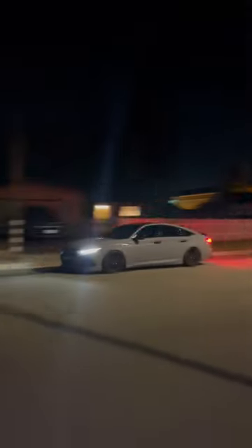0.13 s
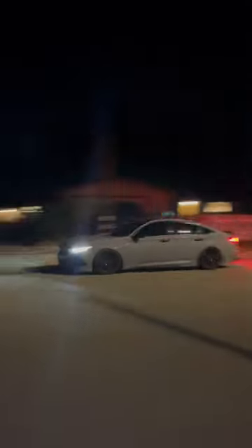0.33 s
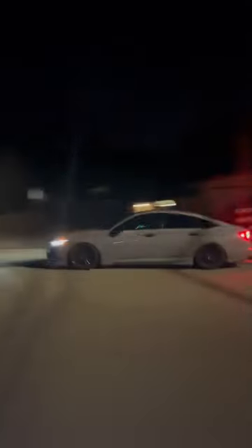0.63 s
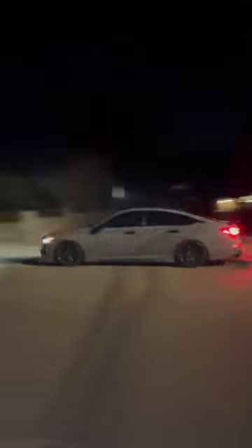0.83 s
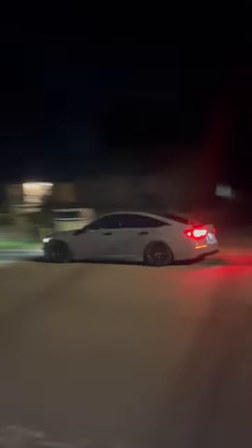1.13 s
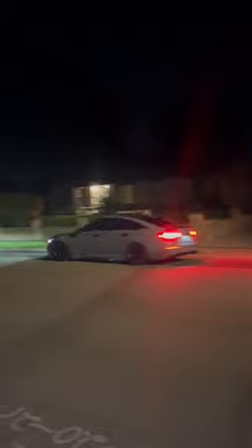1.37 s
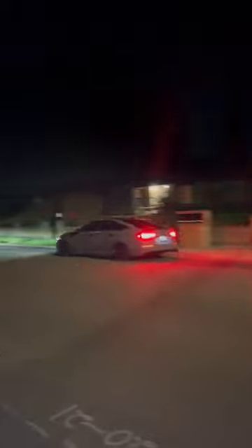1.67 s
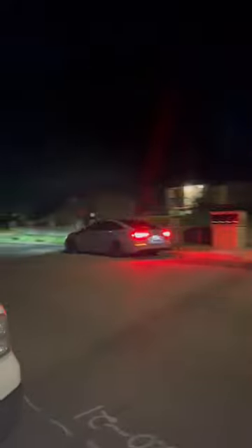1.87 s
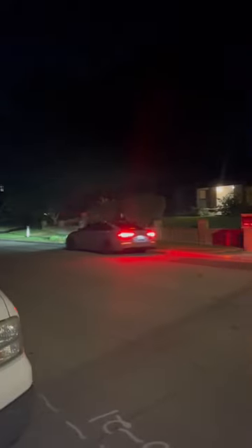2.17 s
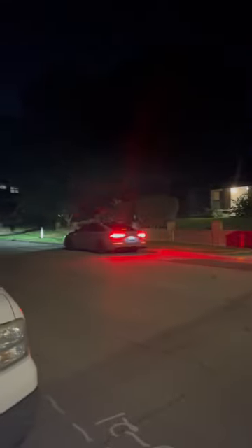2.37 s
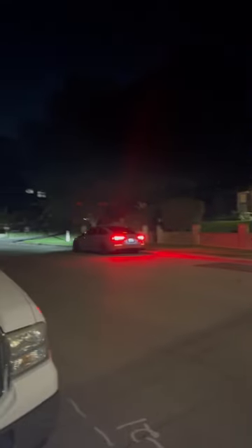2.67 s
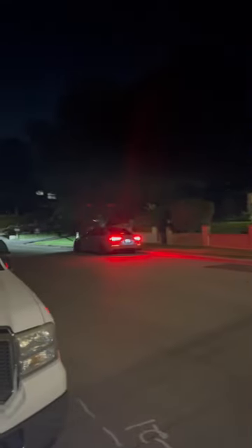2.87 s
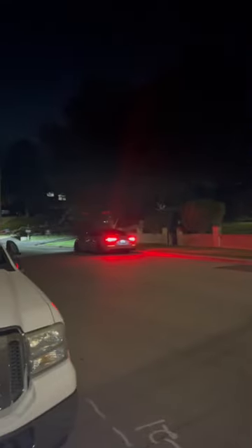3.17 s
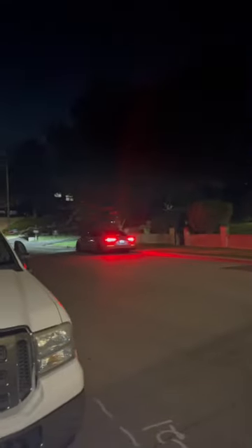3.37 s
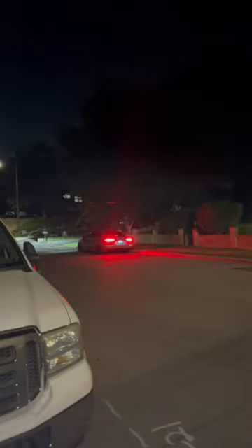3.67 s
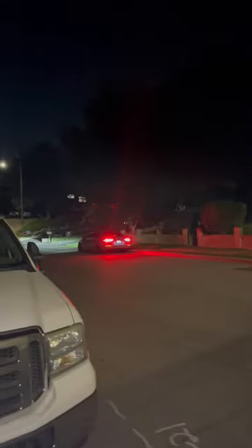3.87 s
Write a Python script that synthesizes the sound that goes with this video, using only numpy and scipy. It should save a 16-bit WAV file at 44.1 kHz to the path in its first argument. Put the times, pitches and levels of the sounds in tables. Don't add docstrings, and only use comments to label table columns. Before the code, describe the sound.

Car exhaust pops and crackles rapidly over a sinking engine burble as it drives away at night

```python
import sys
import numpy as np
from scipy import signal
from scipy.fft import rfft, irfft
from scipy.io import wavfile
from scipy.ndimage import uniform_filter1d, minimum_filter1d

SR = 44100
rng = np.random.default_rng(int(sys.argv[2]) if len(sys.argv) > 2 else 0)


def invert_db(level):
    return 10 ** (np.asarray(level, dtype=float) / 20)


def digitize_waveform(pressure):
    field = np.atleast_2d(pressure).T
    bounded = np.clip(field, -1, 1)
    quanta = np.round(bounded * 32767).astype(np.int16)
    wavfile.write(sys.argv[1], SR, quanta)


N = 176400


def read(points, hz, column=1):
    table = np.array(points, float)
    return np.interp(np.log(hz + 1), np.log(table[:, 0] + 1), table[:, column])


def control(table, column):
    table = np.array(table)
    return np.interp(np.arange(N) / SR, table[:, 0], table[:, column])


def evened(x):
    return x / np.sqrt(np.mean(x ** 2) + 1e-20)


def drift(shape, *sizes):
    x = rng.standard_normal(shape)
    for axis, size in sizes:
        x = uniform_filter1d(x, size, axis=axis)
    return evened(x)


def coloured(x, points):
    gain = invert_db(read(points, np.fft.rfftfreq(len(x), 1 / SR)))
    return irfft(rfft(x) * evened(gain), len(x))


def patchy(points, patchy_db):
    hz, _, z = signal.stft(rng.standard_normal(N), SR, nperseg=1024)
    patches = drift(z.shape, (0, 8), (1, 6))
    level_db = read(points, hz)[:, None] + patchy_db * patches
    return evened(signal.istft(z * invert_db(level_db), SR, nperseg=1024)[1][:N])


def ring(x, hz, per_s):
    turn = np.exp(2j * np.pi * np.cumsum(hz * np.ones(N)) / SR)
    return (turn * signal.lfilter([1], [1, -np.exp(-per_s / SR)], x / turn)).imag


def train(rows, lag_s=0.0001):
    nearest_s, nearest_m, speed_m_per_s, bounce_s = 0.45, 8, 4.9, 0.0038
    bounce_db, hidden_db, hidden_until_s = -2.9, -6, 0.64
    start_s, level_db = np.transpose(rows)
    late_s = bounce_s * nearest_m / np.hypot(nearest_m, speed_m_per_s * (start_s - nearest_s))
    bounce_level_db = level_db + bounce_db + hidden_db * (start_s < hidden_until_s)
    direct, bounce = np.zeros((2, N + SR))
    np.add.at(direct, ((start_s + lag_s) * SR).astype(int), invert_db(level_db))
    np.add.at(bounce, ((start_s + lag_s + late_s) * SR).astype(int), invert_db(bounce_level_db))
    return direct[:N], bounce[:N]


# start_s, level_db
POPS = [(0.0041, -5), (.0187, -6), (0.0493, -0.5), (0.0796, -11.5), (0.0859, 2.5), (0.1004, -5.5),
        (0.1458, 2), (0.161, -1), (0.1684, -3.5), (0.1835, -2), (0.2053, 6.5), (0.2206, -11.5),
        (0.2596, 4), (0.2668, -8.5), (0.313, 2), (.343, -15), (0.3603, -3.5), (0.3745, -3),
        (0.3824, 3.5), (0.3902, -2.5), (.446, -3), (.4862, -4), (0.4944, 3.5), (.5102, -10),
        (0.5262, -4), (0.5343, 6), (0.5493, -2), (0.5821, -1), (0.5987, -11), (0.6241, -1.5),
        (0.6482, 2.5), (.682, 0), (0.7078, -7.5), (0.7659, 8),
        (0.8016, 4), (0.8104, -1), (0.8187, -7.5), (0.8273, -3), (.871, -6), (0.9153, 1),
                (0.9232, 3.5), (0.9326, 1), (0.9458, -6), (0.9701, -2.5), (0.985, -7), (1.023, -8.5),
                (1.033, -2.5), (1.063, -5.5), (1.0809, 4.5), (1.0931, 1), (1.0975, -3), (1.1082, 2),
                (1.1479, -5), (1.245, -9.5), (1.2625, 1.5), (1.387, 2), (1.4108, -4), (1.4205, -4.5),
                (1.4279, -6.5), (1.548, -1.5), (1.5572, 2), (1.5699, -10.5), (1.5922, -0.5), (1.661, 1.5),
                (1.729, 9.5), (1.7403, 6), (1.7766, 1.5), (1.8107, -7.5),
        (1.824, -5), (1.8621, -6.5), (1.884, -21), (1.8991, -3), (2.012, 2), (2.0249, 2.5),
                (2.0377, -3), (2.051, -12.5), (2.0654, -2.5), (2.0937, -5.5), (2.192, -15.5), (2.2471, -2),
                (2.2562, -16), (2.2757, -10), (2.302, -12), (2.332, -20), (2.3928, 5), (2.4103, -11.5),
                (2.424, -0.5), (2.44, -24), (2.4548, -17.5), (2.5518, -11), (2.5687, -13), (2.6695, -13),
                (2.6758, -22), (2.6941, -15.5), (2.8175, -13), (3.016, -16), (3.0408, -12), (3.2239, -32),
                (3.3977, -26)]


def pops():
    return invert_db(-7.5) * np.array(train(POPS))


# start_s, main_wave_hz, pop_ring_db, pop_edge_db, main_wave_song_db
MUFFLER = [(0, 260.9, -6.5, 6, -7), (.04, 262.5, -4, 5, -28), (.3, 259.5, -3.5, -1, -32.5),
           (.41, 256.5, -7, -2.5, -10.5), (.6, 246.9, 1, 2, -17), (.72, 251.4, -4, -6, -28.5),
           (.8, 250.8, -3.5, -5, -12.5), (1.0, 241.1, -2, -12, -26.5), (1.09, 243.7, -1.5, -4, -16),
           (1.33, 239, -4, -8.5, -31.5), (1.55, 248, -2, -6, -14), (1.75, 246.7, -3.5, 2, -20),
           (2.0, 239.7, -6.5, -4.5, -35.5), (2.29, 243.2, -3, -8.5, -19), (2.47, 247.4, -7.5, -0.5, -32.5),
           (2.58, 240.5, 8.5, -12.5, -31.5), (2.8, 252, 4, -3.5, -35.5), (3.2, 247, 5, -10, -52)]


def chirp(clicks):
    top_hz, end_hz, fall_s, rise_s, fade_s = 1900, 390, 0.0009, 0.00045, 0.0035
    t = np.arange(700) / SR
    hz = end_hz + (top_hz - end_hz) * np.exp(-t / fall_s)
    shape = (1 - np.exp(-(t / rise_s) ** 2)) * np.exp(-(t / fade_s) ** 2)
    sweep = -shape * np.sin(2 * np.pi * np.cumsum(hz) / SR - 1.2)
    sweep = signal.lfilter(*signal.butter(2, 2900, fs=SR), sweep)
    full = signal.oaconvolve(clicks, sweep)[:N]
    body = signal.filtfilt(*signal.butter(2, 1110, fs=SR), full)
    return body + invert_db(control(MUFFLER, 3)) * (full - body)


# pitch_hz, t60_s, level_db
PIPE = [(59.8, 0.52, -3), (91.8, 0.19, 2), (167.1, 0.4, -8.5), (253.6, 0.14, 6.5), (318.8, 0.13, 4),
        (365, 0.18, -0.5), (480.9, 0.18, -6), (523.7, 0.068, 3), (664, 0.085, -5.5)]


def pipe(clicks):
    rise_s = 0.0028
    sink = control(MUFFLER, 1) / 250
    out = np.zeros(N)
    for hz, t60_s, db in PIPE:
        slow = ring(clicks, hz * sink, np.log(1000) / t60_s)
        out += invert_db(db) * (slow - ring(clicks, hz * sink, 1 / rise_s))
    return out


def bursts(rows, points, bounce_share, rise_s, hold_s, fade_s):
    t = np.arange(3000) / SR
    direct, bounce = train(rows, lag_s=0)
    shape = np.exp(-np.maximum(t - hold_s, 0) / fade_s) * np.minimum(t / rise_s, 1)
    level = signal.oaconvolve(direct + bounce_share * bounce, shape)[:N]
    return level * coloured(rng.standard_normal(N), points)


# start_s, peak_db
CRACKS = [
    (.0865, -34),
    (.648, -25.5),
    (.766, -40),
    (1.081, -30.5),
    (1.0895, -34),
    (1.729, -24.5),
    (1.7405, -14),
    (2.028, -41.5),
    (2.3925, -48.5),
]
# pitch_hz, level_db
CRACK = [(1500, 3.5), (2500, 3), (3500, -9), (4500, -1.5), (6200, -7), (8500, -4.5), (11000, -18),
         (13000, -32)]


def cracks():
    points = [(700, -42.0)] + CRACK + [(14000, -68.5)]
    return bursts(CRACKS, points, bounce_share=0.24, rise_s=0.0001, hold_s=0.002, fade_s=0.0029)


# start_s, peak_db
SNAPS = [(.0796, -33.5), (.1458, -36.5), (.2053, -45), (.313, -34), (.5343, -42), (.5821, -38),
         (.7657, -15.5), (.8184, -36.5), (.9157, -37.5), (.9242, -29), (.9329, -24.5), (1.0808, -20.5),
         (1.5571, -47.5), (1.5922, -43.5), (1.6602, -48), (1.7762, -39.5), (2.012, -39), (2.3925, -47)]


def snaps():
    points = [(1200, -30), (2200, 3), (3000, 4), (4500, 0.5), (6500, -22), (9000, -35.5)]
    return bursts(SNAPS, points, bounce_share=1.0, rise_s=0.0001, hold_s=0.00013, fade_s=0.00088)


# start_s, firings_hz, drone_db, burble_db, third_order_db, hiss_db
ENGINE = [(0.0, 139.3, -14.5, -16, -18, -52), (0.14, 135.6, -28, -10.5, -45, -53.5),
          (0.69, 118.2, -37.5, -12.5, -49, -57.5), (1.09, 105.6, -37, -12.5, -37, -61),
          (1.35, 98.37, -18, -13.5, -29.5, -65.5), (1.77, 84.3, -24.5, -16.5, -20, -62.5),
          (1.98, 76.9, -20, -16.5, -42, -66.5), (2.13, 73.82, -23, -19, -23, -67.5),
          (2.29, 65.02, -19.5, -18, -39, -69.5), (2.5, 60, -31.5, -22.5, -37.5, -73.5),
          (2.75, 56.93, -21.5, -29.5, -37, -70.5), (3.15, 51.94, -32, -35, -31.5, -79),
          (3.23, 53.3, -36, -44, -32, -79), (3.52, 49.5, -45, -45, -48, -82),
          (3.74, 44.65, -38, -71, -34, -84), (4.0, 41.5, -49.5, -55, -33, -86)]


def drone(turns):
    main_wave_turns = np.cumsum(control(MUFFLER, 1)) / SR
    tone = invert_db(control(ENGINE, 2)) * np.sin(2 * np.pi * turns)
    tone += invert_db(control(ENGINE, 4) - 1.5) * np.sin(3 * 2 * np.pi * turns)
    tone -= invert_db(control(MUFFLER, 4)) * np.cos(2 * np.pi * main_wave_turns)
    waver_db = 1.5 * drift(N, (0, 2500), (0, 1500))
    return np.sqrt(2) * tone * invert_db(waver_db - 3.0)


def firings(turns):
    at = np.flatnonzero(np.diff(np.floor(turns)))
    luck = rng.standard_normal((600, 2))[:len(at)]
    start_s = np.maximum(at / SR + 0.002 * luck[:, 1], 0)
    clicks = train(np.c_[start_s, 3.5 * luck[:, 0]])[0]
    clicks[0] += 6
    return clicks * invert_db(control(ENGINE, 3)) / np.sqrt(control(ENGINE, 1) / 100)


# pitch_hz, density_db
HISS = [(1500, 14.5), (2500, 7.5), (4000, -0.5), (6000, 0), (7500, -5), (10500, -1.5), (11800, -14),
        (12800, -33)]


def hiss():
    points = [(900, -40)] + HISS + [(13500, -60)]
    return invert_db(13.5 + control(ENGINE, 5)) * patchy(points, patchy_db=0.8)


def engine():
    turns = np.cumsum(control(ENGINE, 1)) / SR
    tone = drone(turns)
    clicks = firings(turns)
    puffs = chirp(clicks)
    burble = invert_db(-22) * puffs + invert_db(-11) * pipe(clicks)
    return tone + burble + hiss(), invert_db(-8) * puffs


# start_s, peak_db
TICKS = [
    (2.3194, -39),
    (2.5207, -40),
    (2.587, -37),
    (2.8403, -39.5),
    (2.9372, -37),
    (2.9567, -37),
    (3.2229, -34),
    (3.5287, -34.5),
]


def ticks():
    points = [(700, -63.5), (1200, -13.5), (1900, -2.5), (2400, -9.5), (2900, -47), (5000, -81)]
    return invert_db(-7.0) * bursts(TICKS, points, bounce_share=0.21, rise_s=0.0012, hold_s=0.0049, fade_s=0.0053)


# start_s, peak_db
GRIT = [(2.7072, -61), (2.9551, -62), (3.0364, -62), (3.1357, -65), (3.3811, -64), (3.45, -65),
        (3.4769, -65), (3.5992, -63), (3.979, -63)]


def grit():
    points = [(2500, -28.5), (4000, -6), (6000, 5.5), (8000, -13.5), (12000, -29.5)]
    return bursts(GRIT, points, bounce_share=0.1, rise_s=0.0001, hold_s=0.0005, fade_s=0.001)


def squeak():
    start_s, length_s, pitch_hz, level_db = 1.99, 0.035, 4420, -64
    t = np.arange(N) / SR
    waver = 1 + 1.1 * drift(N, (0, 300))
    swell = np.exp(-((t - start_s) / length_s) ** 2)
    return invert_db(level_db) * waver * swell * np.sin(2 * np.pi * pitch_hz * t)


# pitch_hz, t60_s
STREET = [(200, 0.33), (600, 0.07), (1500, 0.091), (5000, 0.066)]


def street(x):
    t = np.arange(N) / SR
    out = np.zeros(N)
    for window in (np.sin(2 * np.pi * 7.3 * t), np.cos(2 * np.pi * 7.3 * t)):
        taps = np.zeros(SR // 2)
        at = np.arange(220, len(taps) - 30, 30)
        taps[at + rng.integers(0, 30, len(at))] = rng.choice([-1., 1.], len(at))
        hz, s, z = signal.stft(taps, SR, nperseg=256)
        decay = invert_db(-60 * s / read(STREET, hz)[:, None])
        tail = signal.istft(z * decay, SR, nperseg=256)[1]
        out += signal.oaconvolve(x * window, tail / np.linalg.norm(tail))[:N]
    return out


# pitch_hz, width_hz, level_db
HUM = [(95, 8.2, -37), (173, 5.4, -37), (351.2, 8, -48.5), (451.4, 12, -53.5)]


def hum():
    noise = rng.standard_normal(N)
    return sum(invert_db(db) * evened(ring(noise, hz, np.pi * width_hz)) for hz, width_hz, db in HUM)


# pitch_hz, density_db
NIGHT = [(30, -30.5), (60, 4.5), (110, -5.5), (200, -15.5), (350, -19), (700, -33.5), (2000, -48.5),
         (4000, -66.5), (11000, -69)]


def night():
    return invert_db(-35) * patchy([(15, -64)] + NIGHT + [(13500, -100)], patchy_db=3.0)


def scene():
    direct, bounce = pops()
    steady, rasp = engine()
    sharp = cracks() + snaps() + grit()
    knocks = ticks()
    pop_ring = invert_db(-13) * pipe(direct * invert_db(control(MUFFLER, 2)))
    echoes = street(invert_db(-6) * (chirp(direct) + 0.52 * sharp + 0.27 * knocks) + rasp)
    field = chirp(direct + bounce) + pop_ring + sharp + steady + knocks + squeak()
    field = field + echoes + hum() + night()
    return np.array([field, field])


# pitch_hz, left_minus_right_db, right_phase_rad
WIDENING = [(100, -2.5, 0), (600, -5.2, -.35), (900, -1.5, -.55), (1150, 1.5, -.2), (1900, .5, -.3),
            (2550, 5, -1.3), (2750, 5, 1.1), (3500, -4, 0),
            (4000, 0, .2), (4550, -7, -1.8), (4800, -4, -3.2), (5900, 0, -6.28), (8400, 0, -9.35),
                 (9600, 0, -9.5), (11800, 0, -12.56)]


def widened(field):
    margin = 4096
    field = np.pad(field, margin, mode="reflect")
    hz = np.fft.rfftfreq(len(field), 1 / SR)
    widening = WIDENING
    tilt = invert_db(read(widening, hz) / 2)
    turn = np.exp(0.5j * read(widening, hz, column=2))
    smear = rfft(rng.standard_normal(400) * np.exp(-np.arange(400) / 80), len(field)) / 6.3
    share = 0.8 / (1 + ((hz - 2650) / 250) ** 4) + 0.6 / (1 + ((hz - 4600) / 350) ** 4)
    share += 0.15 / (1 + ((hz - 750) / 300) ** 4) + 0.2 * (hz > 6300)
    unlike = smear * share
    z = rfft(field) * hz ** 6 / (hz ** 6 + 54.4 ** 6)
    pair = np.array([z * (tilt / turn + unlike), z * (turn / tilt - unlike)])
    return irfft(pair, len(field))[:, margin:-margin]


def limiter(pair):
    peak = -minimum_filter1d(-abs(pair).max(0), size=600)
    return pair * uniform_filter1d(np.minimum(1, 0.97 / (peak + 1e-9)), size=600)


def top_cut(x):
    return signal.sosfilt(signal.butter(12, 13200, fs=SR, output="sos"), x)


def record(dry):
    mix = limiter(widened(dry[0]))
    return top_cut(mix)


dry = scene()
out = record(dry)
digitize_waveform(out)
```